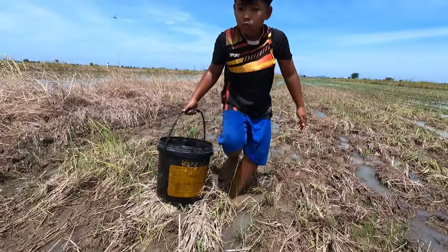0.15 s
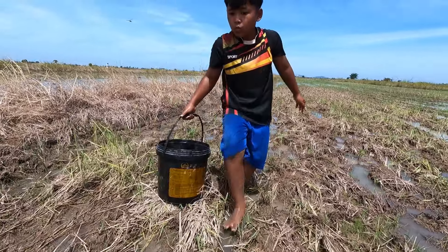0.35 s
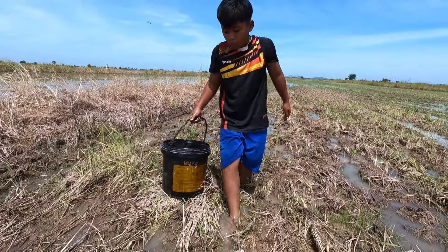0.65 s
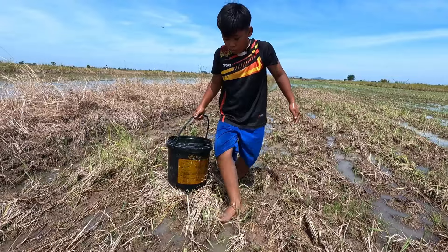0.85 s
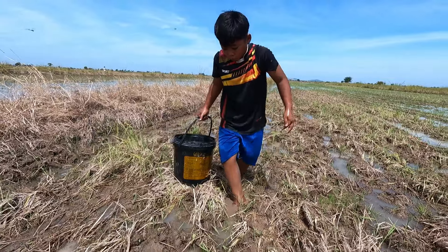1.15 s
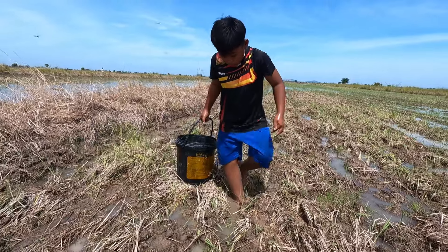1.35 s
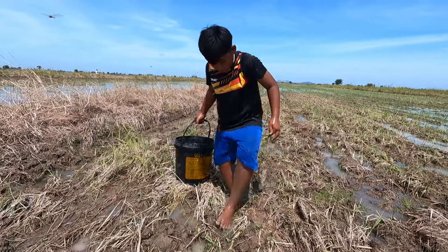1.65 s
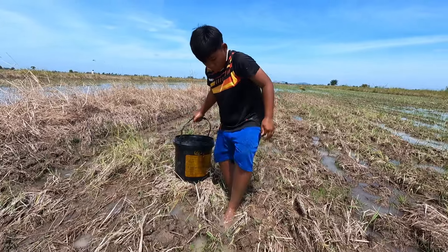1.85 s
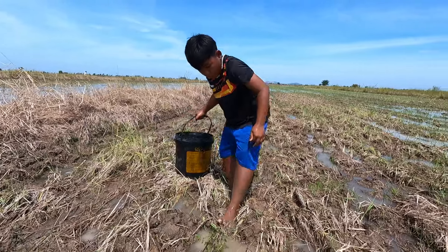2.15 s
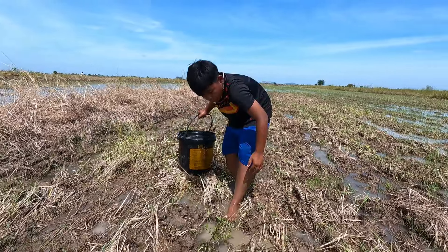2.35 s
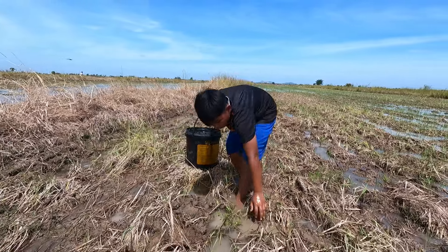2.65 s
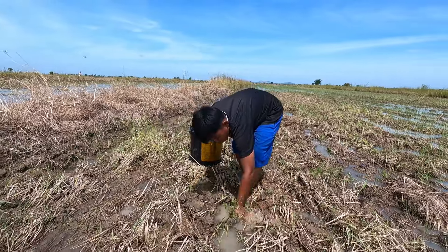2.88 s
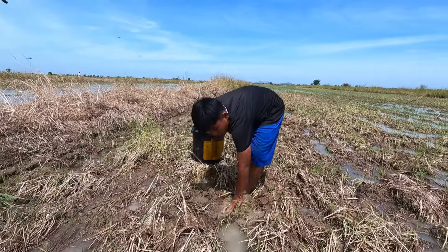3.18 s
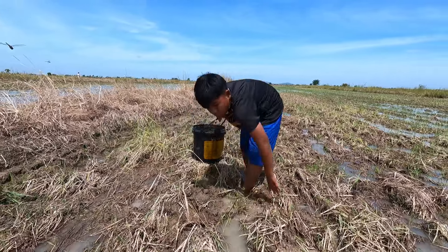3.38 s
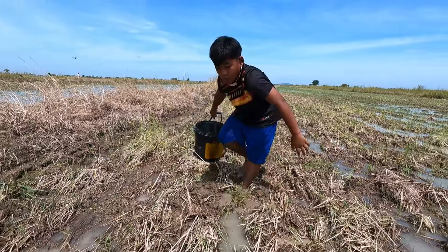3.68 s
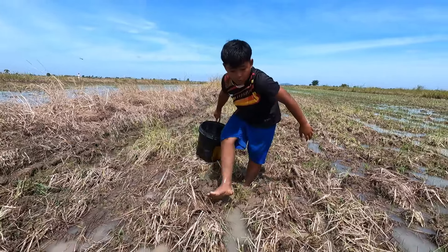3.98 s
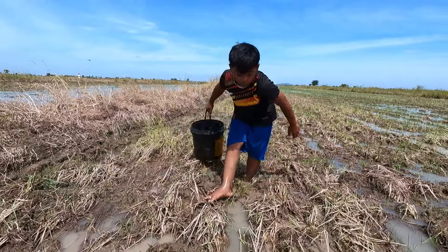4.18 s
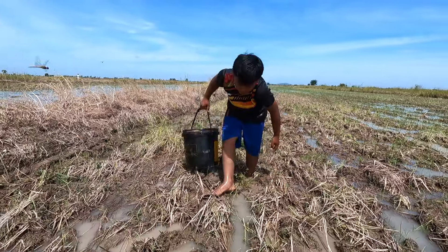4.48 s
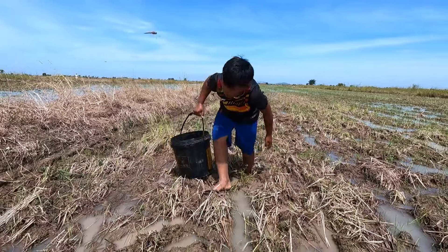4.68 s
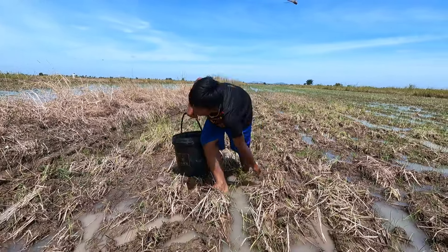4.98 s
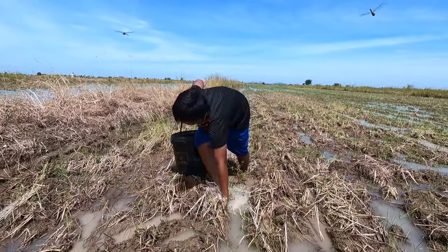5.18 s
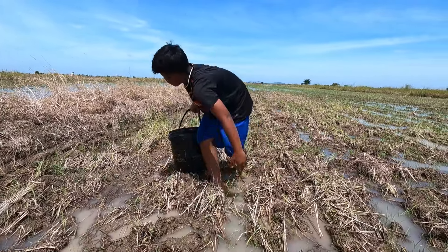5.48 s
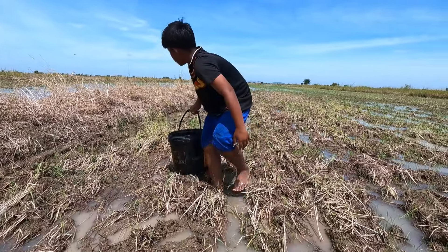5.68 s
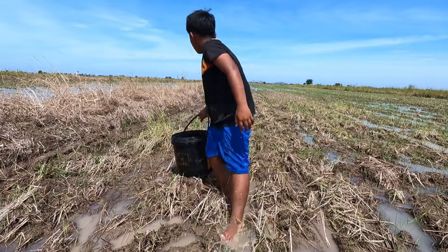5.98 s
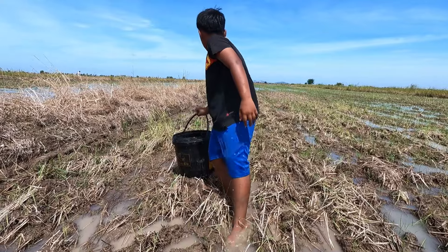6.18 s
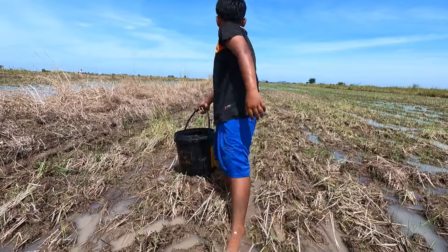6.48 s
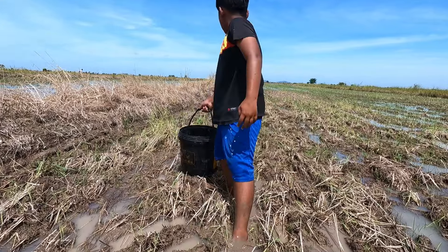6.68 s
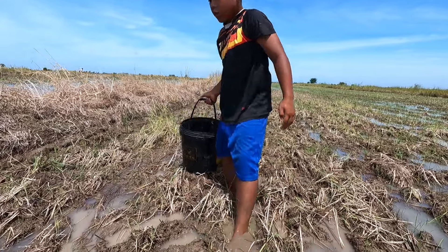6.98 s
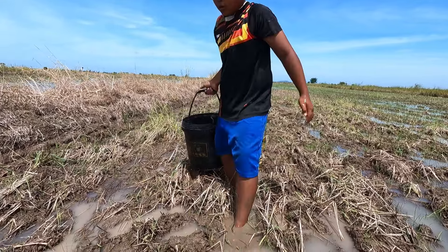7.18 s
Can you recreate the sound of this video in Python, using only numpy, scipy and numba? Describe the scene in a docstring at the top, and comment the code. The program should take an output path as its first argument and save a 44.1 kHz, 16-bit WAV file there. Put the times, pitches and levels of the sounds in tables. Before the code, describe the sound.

A close stereo microphone in an open field, with no echo, hears bare feet in wet mud and straw. From 0 to 1.1 seconds, slushy steps fizz and crackle, with a cluster of straw snaps near 0.5-0.7 and soft wind bumps. A squelch and gulp come at 1.4, a sharp single snap at 1.78, then mostly quiet, sparse ticks until 2.8. Wet stirring and gulps burst at 2.95-3.15, crisp pops at 3.3 and 3.5. Wind thuds and rumbles heavily from 3.5 to 5.4 over thinner mud sounds, a pop at 4.1 and a faint high insect rasp at 4.7. Splashy crackles hit at 5.2 and 5.45; the brightest crunch and a gulp at 5.9. A deep bubble rises quickly in pitch at 6.5, then squelches, pops and gulps continue to 7.1, fading into light bubbling and moderate wind by 7.3.

```python
"""In an open field, bare feet wade through wet mud and straw stubble, and gusts buffet two microphone ports.
Stirred water fizzes and gurgles as swarms of decaying sinusoids over filtered noise; straw and mud pop
as a snap, a ring and splinters; air pockets gulp as low rings that rise in pitch; an insect chirps once
in narrow-band noise. Wind is low-frequency noise with a flickering level, and the right port is duller."""
import sys
import numpy as np
from scipy import signal
from scipy.fft import rfft, irfft
from scipy.io import wavfile
from scipy.ndimage import uniform_filter1d
from numba import njit

SR = 44100
rng = np.random.default_rng(int(sys.argv[2]) if len(sys.argv) > 2 else 0)


def log_audio(samples):
    """Write samples as a 16-bit WAV file to the path given in sys.argv[1]."""
    # one column per channel
    frames = np.atleast_2d(samples).T
    # limit to full scale, then quantise
    limited = np.clip(frames, -1, 1)
    pcm = np.round(limited * 32767).astype(np.int16)
    wavfile.write(sys.argv[1], SR, pcm)


N = 323498  # length [samples]

# Relative spectrum of stirred water and straw: (frequency [Hz], density [dB per Hz])
WATER_SPECTRUM = [(220, -41), (380, -13.5), (578, -14.5), (838, -15), (1180, -2.5), (1880, -2.5),
                  (2090, -4), (3540, -4), (6490, -13), (7580, -10.5), (8580, -20.5), (10000, -15),
                  (12400, -26), (15500, -41)]
# Relative spectrum of wind on the ports: (frequency [Hz], density [dB per Hz])
WIND_SPECTRUM = [(8.8, -43.5), (15, 1), (32, -1), (58, -0.5), (113, -9), (166, -9.5), (221, -17),
                 (285, -19), (374, -30.5), (450, -39.5), (580, -47), (990, -120)]
# Response of the duller right port: (frequency [Hz], gain [dB])
RIGHT_PORT_RESPONSE = [(20, -1.53), (4500, 2.5), (6000, -1.5), (7500, -14.5), (9500, -25), (16000, -65)]
# Steady wind, before flicker: (time [s], rumble level [dB], flutter level [dB])
GUST_LEVELS = [(0, -42, -48.5), (.5, -38.5, -47), (.85, -48, -50), (1.37, -47.5, -49.5), (1.6, -40.5, -48),
               (2.12, -36, -50), (2.35, -49.5, -50), (2.75, -48.5, -48.5), (3.58, -40, -51),
               (3.8, -34, -44), (4.22, -35, -46), (4.5, -39.5, -49.5), (4.75, -36.5, -48),
               (4.9, -35, -43.5), (5.2, -33, -46), (5.3, -42, -48.5), (5.55, -34.5, -47.5),
               (6.3, -39.5, -48), (7.34, -36.5, -48)]
# Single eddies that thud on the ports, before flicker:
# (time [s], Gaussian half length [s], rumble level [dB], flutter level [dB], left minus right [dB])
EDDIES = [(.1, .05, -39, -51, 0), (0.397, 0.094, -34.5, -51.5, -1), (0.675, 0.044, -30, -47, -1),
          (0.936, 0.039, -41, -52.5, -2), (1.526, 0.051, -30.5, -45, -3), (2.512, 0.066, -37, -56, -2),
          (2.95, 0.075, -41, -50.5, -2), (3.337, 0.026, -35, -46.5, -1), (3.476, 0.015, -27.5, -32, -3.5),
          (3.533, 0.022, -26, -36, 3.5), (3.67, 0.025, -24.5, -35, -5), (3.729, 0.013, -28, -32.5, 0),
          (3.777, 0.01, -27, -31.5, -7), (3.96, 0.057, -24, -39, -2), (4.09, .02, -26, -40.5, 3),
          (4.193, 0.016, -29, -34, -4), (4.283, 0.022, -24.5, -40.5, -3), (4.615, 0.029, -21, -37, -5),
          (4.655, 0.028, -29, -31.5, -5), (4.756, 0.033, -34.5, -42, 0), (4.938, 0.044, -29, -35, -2),
          (5.05, 0.059, -25, -39.5, -3), (5.185, 0.023, -23.5, -34, -3), (5.382, 0.017, -33.5, -50, -1)]
# Insect: (start [s], end [s], centre frequency [Hz], bandwidth [Hz], level [dB])
INSECT_CHIRP = (4.715, 4.825, 7950, 450, -52)
# Long clean bubbles, the first as a foot leaves a deep hole:
# (time [s], starting pitch [Hz], 60 dB decay [s], rise [octaves/s], level [dB])
LONG_BUBBLES = [(6.512, 245, .13, 13, -19), (6.187, 1150, .04, 3, -32), (6.815, 1130, .04, 0, -35),
                (6.69, 700, .07, 14, -44), (7.203, 930, .09, 0, -39), (7.225, 960, .12, 0, -42),
                (4.128, 780, .08, 0, -36), (4.455, 950, .15, 0, -45)]
# Gulps of trapped air: (time [s], nominal level [dB], starting pitch of first ring [Hz])
AIR_GULPS = [(.639, -29.5, 770), (.86, -34, 784), (.973, -29, 825), (1.407, -23.5, 900),
             (1.905, -34.5, 640), (2.883, -30, 766), (2.95, -31, 573), (2.978, -27.5, 726),
             (3.073, -23, 600), (3.523, -18, 913), (4.361, -37, 460), (4.649, -30.5, 910),
             (5.109, -33, 706), (5.276, -23.5, 626), (5.316, -25, 650), (5.344, -28.5, 910),
             (5.434, -23, 673), (5.618, -31, 610), (5.707, -24, 550), (5.908, -18, 466),
             (6.238, -26.5, 715), (6.511, -19, 396), (6.791, -22.5, 900), (7.002, -21, 466),
             (7.027, -20, 567)]
# Loud pops of straw and mud: (time [s], nominal level [dB], pitch [Hz],
# splinters away from that pitch, relative level [dB], spray, relative level [dB])
STRAW_POPS = [(0.158, -33, 1780, -14, -26), (0.4963, -20, 4220, -26, -16), (.5306, -25, 4550, -20, -22),
              (.546, -24.5, 1590, -2, -29), (0.5638, -31, 2200, 6.5, -16),
              (0.5969, -20.5, 3470, -5.5, -9.5), (.636, -25, 1950, -1, -18), (.6858, -34, 3620, -12, -14),
              (0.697, -26.5, 4430, -23, -26), (.7646, -36, 1760, 4, -28), (.832, -34, 1600, -7, -33),
              (.915, -25.5, 2980, -1.5, -21), (.9742, -21, 2250, -2, -26), (0.9974, -26.5, 2050, 7, -27),
              (1.3332, -19, 1550, -29, -34), (1.4057, -40, 980, -9, -26), (1.4337, -28, 1360, -1.5, -28),
              (1.644, -29.5, 2980, -9, -24), (1.6653, -28, 1840, -11, -34), (1.78, -9, 3470, -51, -31),
              (1.933, -43, 940, -6, -2), (1.9554, -31, 3810, -22, -30), (2.009, -37.5, 2680, -10, -10.5),
              (2.053, -38.5, 1080, 0, -28), (2.214, -36.5, 1330, 6, -17), (2.3033, -29.5, 1600, 3, -35),
              (2.3296, -39, 1190, -6, -18), (2.541, -41.5, 4360, -25, -4.5), (2.7808, -33.5, 3280, -5, -12),
              (2.9522, -35, 1630, -12, -18), (3.0232, -21.5, 1100, -16, -34),
              (3.0465, -22.5, 1460, -18, -31), (3.239, -35, 990, -5, -20), (3.2769, -18, 3600, -8.5, -32),
              (3.2881, -19.5, 3630, -19, -24), (3.3115, -18, 4430, -8, -35), (3.3267, -22, 1040, -20, -19),
              (3.4201, -31, 1550, -11, -23), (3.465, -26, 3730, -14, -34), (3.519, -25, 2800, -1, -24),
              (3.5253, -14.5, 2840, -1, -26.5), (3.5294, -22, 1605, 0.5, -37),
              (3.6285, -28.5, 1004, -20, -35), (3.814, -34, 3520, -26, -18), (4.118, -15.5, 1780, -6, -24),
              (4.264, -32, 1130, -7, -36), (4.364, -34, 3200, -15, -29), (4.3904, -35.5, 3150, -25, -31),
              (4.4606, -42, 950, 4, -33), (4.508, -39, 3150, -1.5, -26), (4.575, -39, 958, -10, -23),
              (4.653, -32.5, 2120, -16, -26), (4.73, -33.5, 1560, -4, -18), (4.945, -25.5, 1860, -3.5, -26),
              (5.012, -32.5, 1460, -5, -21), (5.054, -34, 1550, -3, -21), (5.085, -35, 1150, -10, -30),
              (5.1524, -29, 1520, -1, -18), (5.2144, -19, 2900, -34, -22), (5.227, -17, 3430, -31, -28),
              (5.248, -20, 2850, -7, -36), (5.3092, -21, 1100, -7, -22), (5.437, -24, 2700, -10, -31),
              (5.462, -30, 1084, 2, -12), (5.6467, -25.5, 3470, -9, -22), (5.7086, -30.5, 2410, -3, -27),
              (5.7967, -25, 4220, -33, -21), (5.866, -28.5, 3240, -20, -26), (5.897, -20, 3410, -10.5, -12),
              (5.91, -11, 3390, -24, -19), (5.929, -15.5, 2940, -30, -36), (5.9354, -14.5, 2740, -34, -38),
              (5.982, -36, 2730, -2, -25), (6.073, -28.5, 1670, 3.5, -12), (6.109, -25, 3760, -26, -23),
              (6.32, -30.5, 4370, -5.5, -9.5), (6.4526, -24.5, 2310, -4, -38), (6.5138, -21, 3430, -5, -23),
              (6.6746, -28, 1490, -1.5, -32), (6.681, -28, 2200, -9, -30), (6.7914, -19, 1856, -10, -42),
              (6.8657, -29, 1050, -26, -35), (7.118, -37, 3350, -15, -25), (6.9272, -32, 1670, -19, -35),
              (6.9377, -30, 1800, -3.5, -38)]
# Dull, bright and spraying splinters: (lowest pitch [Hz], highest pitch [Hz], added level [dB])
SPLINTER_BANDS = [(995, 2300, 5), (2247, 4290, 6), (5370, 9800, 17)]
# Fizz, slosh, gurgle and spray swarms: (lowest pitch [Hz], highest pitch [Hz], rate [bubbles/s],
# decay scale [cycles], size scatter [dB], hiss relative to bubbles [dB], boost [dB])
BUBBLE_SWARMS = [(2275, 5250, 1800, 24.7, 4.5, -4, 2), (962, 2190, 600, 9.6, 3, -3, 1),
                 (374, 1039, 220, 10.8, 3.5, -1.5, 4.5), (5310, 17100, 3800, 5, 8.5, 4.5, 3)]
# Feet and hands stirring the mud; rise and fall each span 20 dB, levels before swarm boost:
# (peak time [s], rise [s], fall [s], fizz level [dB], depth re fizz [dB], spray re fizz [dB])
MUD_STROKES = [(.14, 0.52, 0.37, -45.5, 1.5, -4), (.43, .15, .1, -52.5, -11, 0.5),
               (.495, 0.016, 0.16, -40.5, -10.5, -8), (.56, 0.14, .2, -42.5, -7.5, -7.5),
               (.69, .2, 0.21, -46.5, -1.5, -14), (1.0, 0.17, 0.079, -41.5, 0, -9.5),
               (1.12, .2, 0.82, -56, -5, -8.5), (1.411, 0.034, 0.22, -48, 5, -9),
               (1.46, 0.092, 0.23, -51, 4.5, -9), (1.53, 0.18, 0.19, -55, 3.5, -4.5),
               (1.63, 0.31, 0.21, -49.5, -8, -5), (1.78, 0.025, 0.085, -38, -8.5, -7),
               (1.92, 0.11, .12, -65, 3, -3), (2.11, 0.71, 0.36, -57, -2.5, -10.5),
               (2.32, 0.79, 0.063, -55.5, -3, -5), (2.55, 0.14, .6, -62.5, -1, -5),
               (2.84, 0.31, 0.31, -60, 5, -3), (2.961, 0.085, 0.17, -36.5, -1.5, -12),
               (3.03, 0.34, 0.19, -45.5, 2, -21), (3.12, 0.17, 0.11, -37, -1.5, -11.5),
               (3.291, 0.015, 0.17, -41.5, -6, -4.5), (3.36, 0.19, 0.38, -48, 1, -11),
               (3.48, .4, 0.23, -47, -9, -16), (3.61, 0.31, 0.15, -53.5, 4, -2.5),
               (4.0, 0.33, 0.18, -56.5, 3, -0.5), (4.19, 0.27, 0.19, -53.5, 2, -2),
               (4.45, .3, 0.37, -62, 1.5, -11), (4.66, 0.069, 0.31, -51, 3.5, -6),
               (4.96, 0.16, 0.36, -51.5, 4.5, -16), (5.12, 0.51, 0.26, -52.5, -5, -8),
               (5.23, 0.063, 0.17, -34, -9.5, -11.5), (5.33, 0.21, 0.12, -50.5, 4, -8),
               (5.45, 0.15, 0.089, -37, -2, -12), (5.68, 0.2, 0.14, -49, 2.5, -3.5),
               (5.78, 0.24, 0.24, -44, -6.5, -11.5), (5.899, 0.0089, 0.12, -30.5, -5, -11),
               (6.06, 0.099, 0.36, -46.5, -3, -8), (6.15, 0.27, 0.1, -44.5, -12, -12),
               (6.33, 0.064, 0.11, -48.5, -7, -15), (6.42, 0.24, 0.56, -53, -3.5, -18),
               (6.539, 0.11, 0.16, -44, 1, -9.5), (6.661, 0.039, 0.074, -46.5, -1.5, -11),
               (6.76, 0.1, 0.32, -54.5, -6, -8.5), (6.86, 0.22, 0.31, -58.5, 6.5, -24),
               (7.051, 0.1, 0.06, -46.5, 0, -4.5), (7.2, 0.48, 0.96, -57.5, 2, -5)]
# Mud at rest, before swarm boost: (fizz, slosh, gurgle, spray levels [dB])
SETTLED_LEVELS = [-78, -80, -74.5, -75]
# Side the stirring comes from: (time [s], left minus right [dB])
STIRRING_SIDE = [(0, 4.5), (.5, -0.5), (.8, 6), (1.0, 1), (2.3, 1), (2.88, 8), (2.96, 0.5), (4.2, .5),
                 (4.3, 6.5), (4.6, 5.5), (4.66, 0.5), (4.95, 5), (5.15, 5.5), (5.22, 1), (6.74, 1),
                 (6.79, 12.5), (7.05, 8), (7.34, 4)]


def undb(db):
    """The decibel relation: level to amplitude ratio."""
    return 10 ** (np.asarray(db) / 20)


def unit(x):
    """Normalisation to unit root-mean-square amplitude."""
    return x / np.sqrt(np.mean(x ** 2))


def curves(table):
    """Linear interpolation in time of each column of a table."""
    s, *columns = np.transpose(table)
    return [np.interp(np.arange(N) / SR, s, c) for c in columns]


def colour(table, hz):
    """Spectral level interpolated on a logarithmic frequency axis."""
    table_hz, table_db = np.transpose(table)
    return np.interp(np.log(np.maximum(hz, 1)), np.log(table_hz), table_db, left=-90, right=-90)


def sides(pan_db):
    """Interchannel level difference, split equally between left and right gains."""
    return undb(np.array([pan_db, -pan_db]) / 2)


def noise(table, lo_hz, hi_hz, alike):
    """Spectral shaping of noise in a band; mid and side sums set the correlation of two channels."""
    hz = np.arange(N // 2 + 1) * SR / N
    band_loss = np.sqrt((1 + (lo_hz / (hz + 1)) ** 12) * (1 + (hz / hi_hz) ** 12))
    gain = undb(colour(table, hz)) / band_loss
    mid, side = irfft(rfft(rng.standard_normal((2, N))) * gain, N)
    alike = np.clip(alike, 0, 1)
    return unit(np.sqrt(1 + alike) * mid + np.sqrt(1 - alike) * side * np.array([[1], [-1]]))


def walk(rate):
    """Slow random modulation: Gaussian levels held 1 / rate s, then slewed; spread near 1."""
    k = int(SR / rate)
    held = np.repeat(rng.standard_normal(N // k + 1), k)
    return 1.29 * uniform_filter1d(held, k)[:N]


@njit
def ring(n, s, hz, t60, rise, left, right):
    """Damped resonance: each ring swells quickly, decays exponentially and climbs at its given rate."""
    out = np.zeros((2, n))
    for k in range(len(s)):
        phase, step, size, swell = 0., 2 * np.pi * hz[k] / SR, 1., 1.
        fade, climb = 1000 ** (-1 / (t60[k] * SR)), 2 ** (rise[k] / SR)
        start = int(s[k] * SR)
        for i in range(max(start, 0), min(start + int(t60[k] * SR), n)):
            v = size * (1 - swell) ** 2 * np.sin(phase)
            out[0, i] += left[k] * v
            out[1, i] += right[k] * v
            phase += step
            step = min(step * climb, 2.8)  # radians a sample, kept below the Nyquist limit
            size *= fade
            swell *= 1 - step / 6
    return out


def quiet_field():
    """Diffuse broadband noise: far stubble rustles evenly."""
    return undb(-65) * noise(WATER_SPECTRUM, 900, 12000, .4)


def wind():
    """Turbulent pressure: eddies press on the ports as slow rumble and quick flutter; buffets add power."""
    t = np.arange(N) / SR
    steady_sides = sides(np.full(N, -0.5))
    rumble, flutter = (undb(db) * steady_sides for db in curves(GUST_LEVELS))
    flaps = np.zeros((2, N))
    for s, half_s, db, flutter_db, pan_db in EDDIES:
        near = slice(max(int((s - .3) * SR), 0), int((s + .3) * SR))
        swell = sides(pan_db)[:, None] * np.exp(-.5 * ((t[near] - s) / half_s) ** 2)
        rumble[:, near] = np.hypot(rumble[:, near], undb(db) * swell)
        flaps[:, near] = np.hypot(flaps[:, near], undb(flutter_db) * swell)
    flutter = flutter * noise(WIND_SPECTRUM, 117.3, 570, .9)
    flutter += flaps * noise(WIND_SPECTRUM, 119.0, 620, .13)  # buffet flutter differs between the ports
    rumble = rumble * undb(1.5 + 1.03 * walk(11)) * noise(WIND_SPECTRUM, 5, 111.0, .66)
    return rumble + flutter * undb(2.0 + 1.47 * walk(30))


def insect():
    """Band-limited noise under a short envelope: one raspy chirp."""
    t0, t1, hz, width_hz, db = INSECT_CHIRP
    rasp = noise([(1, 0), (SR, 0)], hz, hz, 0.94)[0]
    edges_hz = [hz - width_hz / 2, hz + width_hz / 2]
    rasp = unit(signal.sosfilt(signal.butter(2, edges_hz, "band", fs=SR, output="sos"), rasp))
    envelope = np.interp(np.arange(N) / SR, [t0, t0 + .025, t1 - .01, t1], [0, 1, 1, 0])
    return undb(db) * rasp * envelope


def long_bubbles():
    """Lightly damped bubble resonance: a few air pockets ring on cleanly in the centre."""
    s, hz, ring_s, rise, db = np.array(LONG_BUBBLES).T.copy()
    return ring(N, s, hz, ring_s, rise, undb(db), undb(db))


def gulps(count=3, t60=.022):
    """Bubble break-up: each air pocket divides into a few low, short rings that rise in pitch."""
    out = np.zeros((2, N))
    s, db, hz = np.transpose(AIR_GULPS)
    pan_db = np.interp(s, *np.transpose(STIRRING_SIDE))
    for k, (late, pitch, place) in enumerate(rng.random((len(s), count, 3)).transpose(1, 2, 0)):
        left, right = undb(db + 1.0 - 1.5 * k) * sides(pan_db + 12 * (place - .5))
        start = s + 0.00798 * k * late
        ring_hz = hz * 2 ** (0.765 * k * (pitch - .5))
        out += ring(N, start, ring_hz, t60 + 0 * s, 3.7 + 0 * s, left, right)
    return out


def pops(count=7, length=.012):
    """Impulsive fracture: a snap and a main ring, then splinters that thin out over a length in s."""
    s, db, hz, far_db, spray_db = np.transpose(STRAW_POPS)
    pan_db = np.interp(s, *np.transpose(STIRRING_SIDE))
    high = hz > SPLINTER_BANDS[1][0] + 10
    near_db = -6  # splinters around a pop's own pitch
    parts_db = np.where(high, far_db, near_db), np.where(high, near_db, far_db), spray_db
    left, right = undb(db + 3.0) * sides(pan_db)
    out = ring(N, s, hz, 33.2 / hz, 0 * s, left, right)
    snap = undb(5 + 4 * np.log2(hz / 2000))  # dry straw, the higher pops, snaps hardest
    out += ring(N, s, .85 * hz, 8.0 / hz, 0 * s, snap * left, snap * right)
    for part_db, (lo_hz, hi_hz, gain_db) in zip(parts_db, SPLINTER_BANDS):
        for k, (late, pitch, place) in enumerate(rng.random((len(s), count, 3)).transpose(1, 2, 0)):
            late = ((k + late) / count) ** 1.8
            left, right = undb(db + part_db + gain_db - 11.3 * late) * sides(pan_db + 9 * (place - .5))
            pitch = ((3 * k + count // 2) % count + pitch) / count  # spread over the whole range
            splinter_hz = lo_hz * (hi_hz / lo_hz) ** pitch
            out += ring(N, s + length * late, splinter_hz, 14.0 / splinter_hz, 0 * s, left, right)
    return out


def swarm(lo_hz, hi_hz, rate, cycles, scatter_db, hiss_db, boost_db):
    """Superposition: countless small bubbles and straw ticks at scattered places, over their blurred hiss."""
    when, pitch, chance, place, decay = rng.random((int(rate * N / SR), 5)).T
    hz = lo_hz * (hi_hz / lo_hz) ** pitch
    rarity = np.minimum(-np.log(chance), 4.5)  # large bubbles are exponentially rare
    size = undb(colour(WATER_SPECTRUM, hz) + scatter_db * rarity) * hz
    left, right = size * sides(14 * (place - .5))
    t60 = np.maximum(cycles, 8) * (0.5 + 2.45 * decay) / hz
    bubbles = unit(ring(N, when * N / SR, hz, t60, 0.23 / t60, left, right))
    hiss = undb(hiss_db) * noise(WATER_SPECTRUM, lo_hz, hi_hz, .71)
    return unit(bubbles + hiss) * undb(boost_db)


def effort():
    """Power addition: each stroke swells and dies away over the settled mud in four bubble sizes."""
    t = np.arange(0, N, 32) / SR
    power = undb(SETTLED_LEVELS)[:, None] ** 2
    for s, rise_s, fall_s, db, depth_db, spray_db in MUD_STROKES:
        rising, falling = (s - t) / max(rise_s, .005), (t - s) / max(fall_s, .005)
        shape_db = db - 20 * np.maximum(rising, falling)
        gurgle_db = -8.5 + 1.86 * depth_db  # the lowest bubbles grow faster with depth than the slosh
        sizes_db = np.array([0, depth_db, gurgle_db, spray_db])
        power = power + undb(shape_db + sizes_db[:, None]) ** 2
    return [np.interp(np.arange(N) / SR, t, np.sqrt(p)) for p in power]


def stirring():
    """Amplitude modulation: four bubble sizes follow the strokes in quick clumps, some common to all."""
    common_clumps = undb(1.6 * walk(30) + 1.3 * walk(90))
    water = np.zeros((2, N))
    for level, row in zip(effort(), BUBBLE_SWARMS):
        own_clumps = undb(2.33 * walk(35))
        water += level * own_clumps * swarm(*row)
    return common_clumps * sides(curves(STIRRING_SIDE)[0]) * water


def scene():
    """Linear superposition of field, stirred mud, pops, air pockets, insect and wind."""
    return quiet_field() + stirring() + pops() + gulps() + long_bubbles() + insect() + wind()


def record(dry):
    """Linear filtering: the right port loses treble, each port adds faint hiss, both are cut at the top."""
    hz = np.clip(np.arange(N // 2 + 1) * SR / N, 30, 15000)
    right = irfft(rfft(dry[1]) * undb(colour(RIGHT_PORT_RESPONSE, hz)), N)
    port_hiss = undb(-79.5) * noise([(1, 0), (SR, 0)], 5000, 9000, 0)
    wet = np.array([dry[0], right]) + port_hiss
    return signal.sosfilt(signal.ellip(10, .2, 80, 15450, fs=SR, output="sos"), wet)


dry = scene()
out = record(dry)
log_audio(out)
```